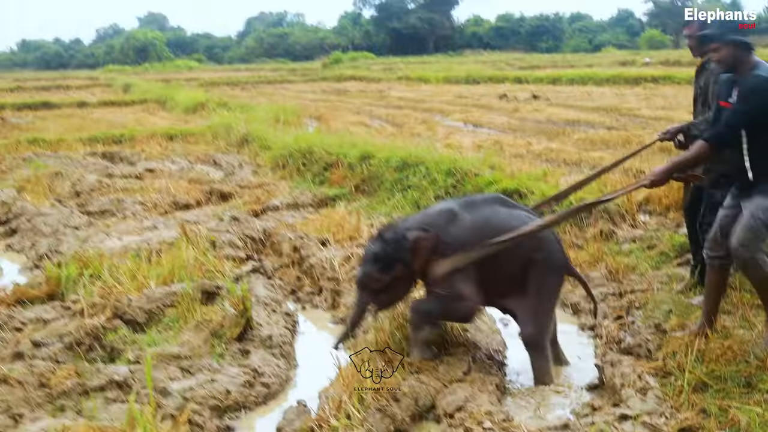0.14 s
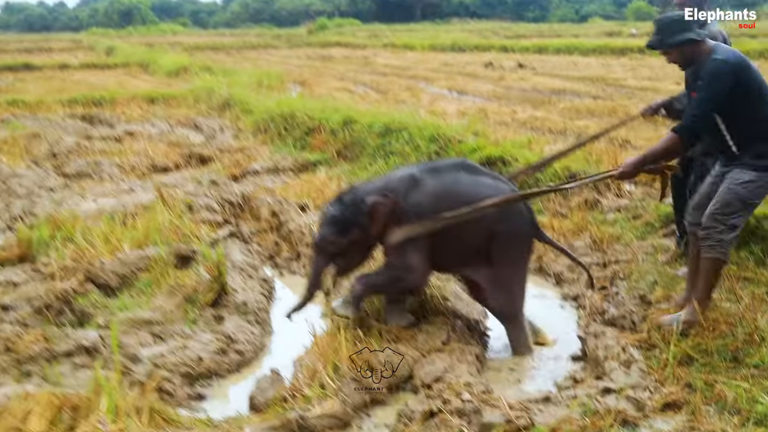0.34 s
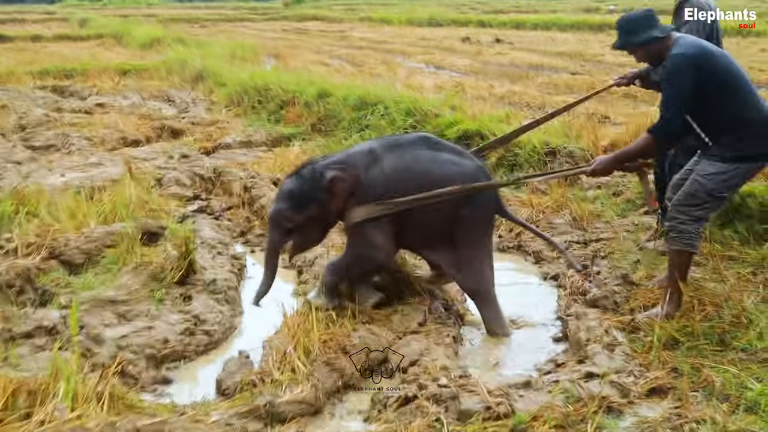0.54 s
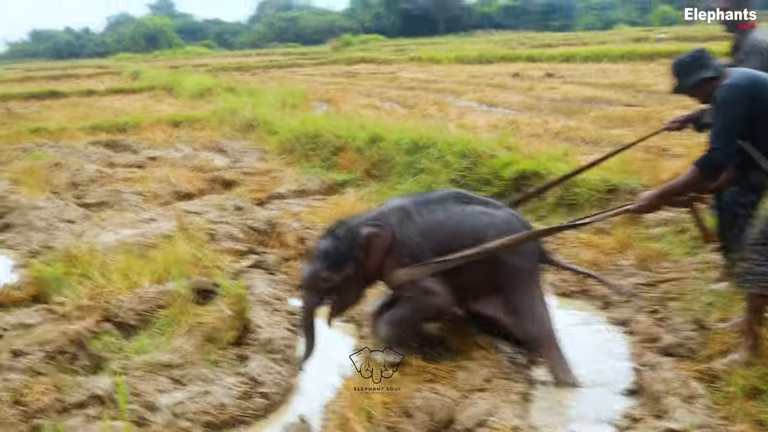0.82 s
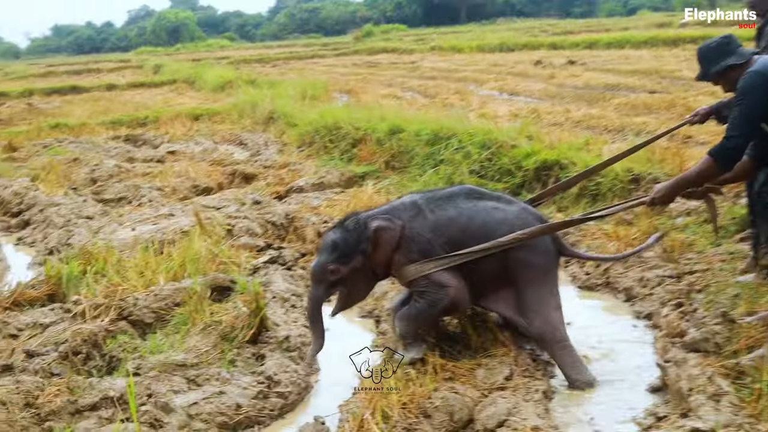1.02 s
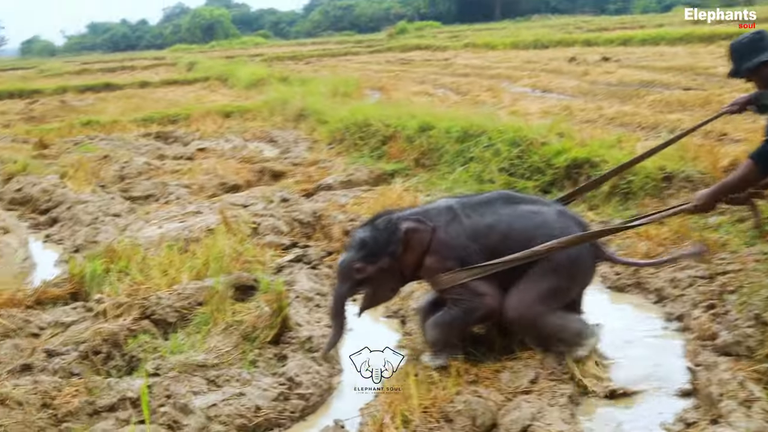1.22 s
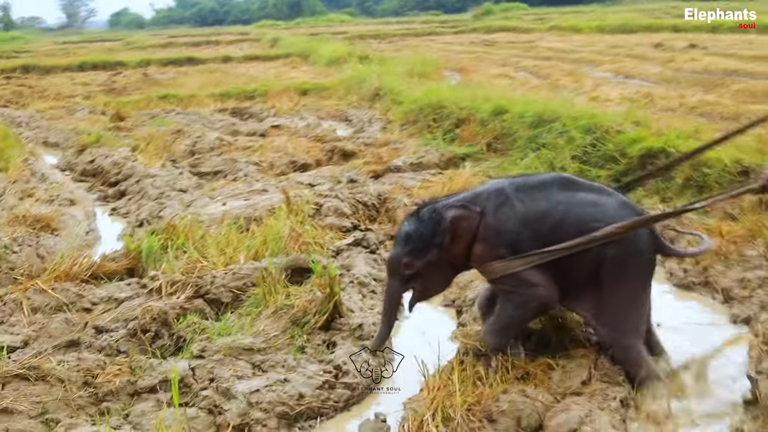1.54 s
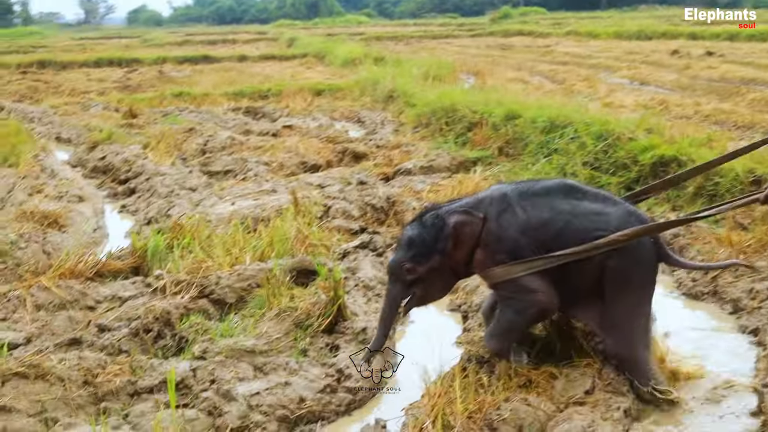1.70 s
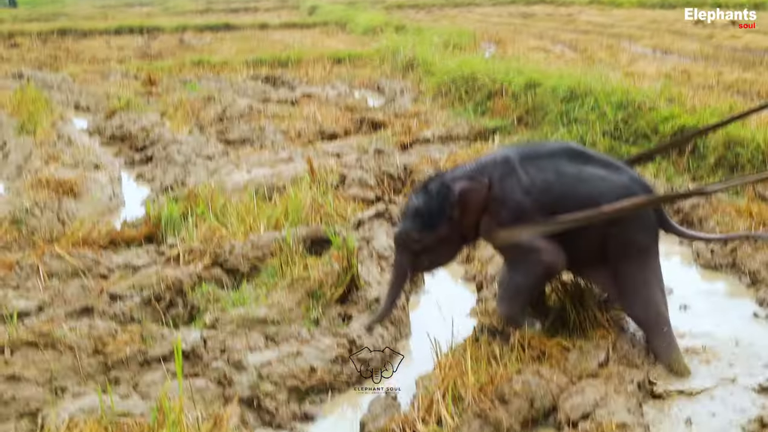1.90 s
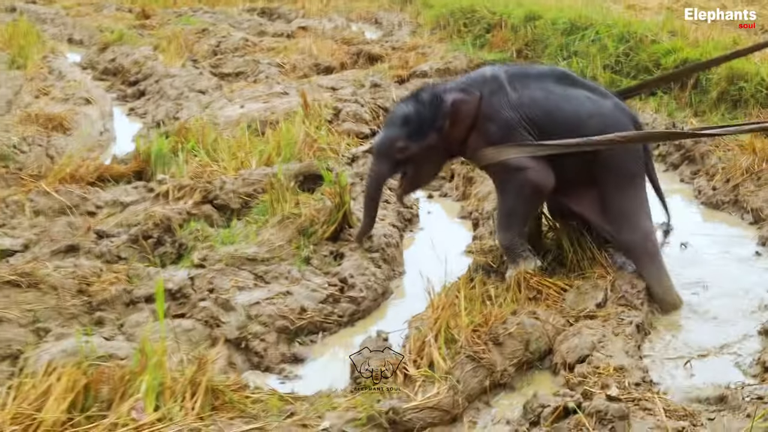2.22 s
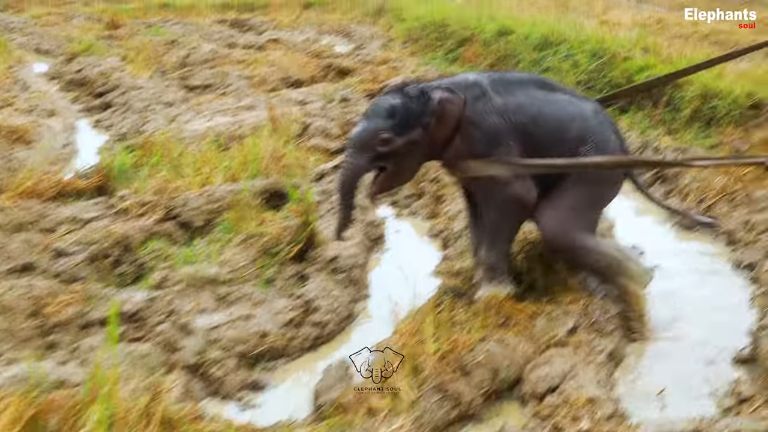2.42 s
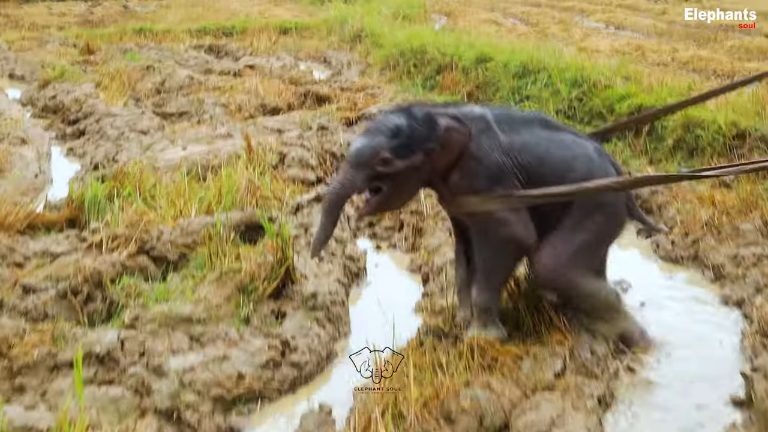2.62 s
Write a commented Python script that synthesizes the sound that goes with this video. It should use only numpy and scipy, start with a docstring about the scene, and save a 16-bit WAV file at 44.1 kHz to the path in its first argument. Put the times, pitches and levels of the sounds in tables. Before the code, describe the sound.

An elephant calf roars twice in an open field. Faint mud plops and a very faint distant tone come first; slow throaty pulses at 0.45 s grow into a gravelly, rasping roar, fading by 1.55. A tiny straw snap and thuds sit beneath it. Soft footfalls and wet splashes fill 1.45-2.2. A harsher, brighter roar starts near 2.3, continuing to the end at about 2.75. Low wind rumbles throughout.

```python
"""An elephant calf roars twice in an open muddy field: slow rough throat pulses ring in its throat resonances.
Slow pulses open the first roar, low multiples of the pulse rate add chest rumble, and breath puffs rasp.
A straw snaps as a click rings two modes; feet thud by ringing ground modes; mud splashes as short rings.
A faint pair of partials sounds far off, and bands of noise make the field noise and wind rumble below."""
import sys
import numpy as np
from scipy import signal
from scipy.io import wavfile
from scipy.ndimage import uniform_filter1d

SR = 44100
rng = np.random.default_rng(int(sys.argv[2]) if len(sys.argv) > 2 else 0)


def volts(x):
    """Linear amplitude factor 10**(x/20) for a level x in dB, scalar or array-like."""
    e = np.asarray(x, float) / 20
    return 10 ** e


def master(y):
    """Save y as 16-bit WAV."""
    cut = np.clip(np.atleast_2d(y).T, -1, 1)
    pcm = np.round(cut * 32767)  # scale
    wavfile.write(sys.argv[1], SR, pcm.astype(np.int16))


N = 121275  # samples

# vocal folds: (time [s], pulse rate [1/s], roughness [0-1])
VOCAL_FOLDS = [(0.44, 44, 0.6), (0.65, 47, 0.8), (0.9, 50, 0.6), (1.2, 56, 0.8), (1.33, 66, 0.48),
               (1.5, 58, .6), (2.27, 50, 0.8), (2.75, 52, 0.5)]
# throat resonances of each roar, four groups: (frequency [Hz], overall width [Hz], relative level [dB])
FIRST_THROAT = [
    [(475, 114, 0), (597, 46, -9.5)],
    [(915, 43, -11), (1110, 195, 4), (843, 347, -0.5)],
    [(1401, 150, 1), (1680, 129, -2.5), (1900, 157, -3.5)],
    [(2796, 450, 9.5), (4010, 313, 3), (4370, 1300, -2.5), (6090, 1500, -8.5)],
]
SECOND_THROAT = [
    [(484, 57, 7.1), (670, 130, 2)],
    [(947, 102, -4.5), (846, 19, -7), (1253, 32, -12.5)],
    [(1448, 360, 1.5), (2043, 97, -2), (2336, 160, -1.5)],
    [(2750, 124, 9), (4010, 1600, -8), (5020, 680, -13.5), (6204, 190, -8.5), (8040, 890, -24)],
]
# level of the lowest resonance group, one list per roar: (time [s], level [dB])
LOWEST_LEVEL = [
    [(0.585, -75), (0.612, -34), (0.648, -33.5), (0.666, -20), (0.686, -30.5), (0.716, -21.5),
     (0.75, -41.5), (0.782, -24), (0.832, -36), (0.858, -24.5), (0.888, -33), (0.932, -27.5), (0.948, -34),
     (1.048, -27.5), (1.092, -32.5), (1.232, -29), (1.366, -37), (1.56, -62)],
    [(2.27, -94), (2.3, -47), (2.336, -35.5), (2.494, -26), (2.75, -26.5)],
]
# level of the second resonance group, one list per roar: (time [s], level [dB])
SECOND_LEVEL = [
    [(0.46, -60.5), (0.56, -47), (0.67, -39.5), (0.72, -30), (0.818, -30.5), (0.858, -28), (0.918, -32),
     (1.044, -30.5), (1.268, -31.5), (1.516, -56), (1.56, -72)],
    [(2.28, -70), (2.32, -42.5), (2.37, -31.5), (2.47, -26), (2.487, -11), (2.501, -30), (2.515, -12.5),
     (2.532, -25), (2.545, -17), (2.567, -15), (2.578, -29), (2.588, -17), (2.6, -16.5), (2.612, -23),
     (2.62, -30.5), (2.628, -11), (2.638, -30), (2.653, -17.5), (2.667, -18.5), (2.68, -17), (2.75, -23)],
]
# levels of the two upper groups, one list per roar: (time [s], upper throat level [dB], treble level [dB])
UPPER_LEVELS = [
    [(0.46, -61, -69), (0.6, -44.5, -64.5), (0.67, -35.5, -51.5), (0.84, -39, -58), (1.02, -37, -54.5),
     (1.26, -43, -58), (1.36, -51, -59), (1.43, -56, -65), (1.56, -58.5, -71)],
    [(2.28, -70, -87), (2.31, -55, -72), (2.36, -39.5, -50), (2.47, -37, -39.5), (2.58, -35.5, -42),
     (2.75, -31, -40.5)],
]
# tones locked to the two lowest groups:
# (time [s], low frequency [Hz], second frequency [Hz], low power share [0-1], second power share [0-1])
LOCKED_TONES = [(0.44, 463, 925, 0.6, 0), (0.75, 464, 930, 0.69, 0.44), (0.87, 480, 971.5, 0.46, 0.26),
                (1.05, 475, 1099, .25, 0.11), (1.3, 495.5, 1033, 0.12, 0.02),
                (1.5, 468.9, 1110, 0.06, 0.06), (2.28, 530, 900, 0.44, 0.05), (2.44, 520, 963, .55, 0),
                (2.49, 512, 968, 0.75, 0.82), (2.6, 512, 966.3, 0, 0.35), (2.75, 520, 924, 0.13, 0.02)]
# sinking strands of the second roar, one on the upper band, one on the treble:
# (time [s], frequency [Hz], level relative to the band [dB])
SINKING_STRANDS = [
    [(2.33, 2210, -19), (2.45, 2030, 2.5), (2.53, 1860, 0.5), (2.57, 1570, 4.5), (2.75, 1480, -4.5)],
    [(2.35, 2800, 11), (2.5, 2660, -8), (2.59, 2290, 2.5), (2.75, 2200, 4.5)],
]
# throbbing of the breath from cycle to cycle, one per roar: (depth exponent [1])
BREATH_THROB = [.9, .55]
# how firmly each cycle shuts the breath, one per resonance group: (exponent [1])
BREATH_SHUTTING = [.3, .45, .65, .75]
# calf's left minus right, one per resonance group: (level difference [dB])
CALF_PAN = [-7.5, -4, -11.5, 0.5]
# calf's ground echoes, one per resonance group: (level relative to the direct sound [dB])
CALF_ECHO = [-34.5, -12, -12, -5.5]
# slow separate pulses that open the first roar: (time [s], peak level [dB])
OPENING_PULSES = [(0.463, -36), (0.509, -31), (0.553, -26), (0.593, -27)]
# chest rumble: (time [s], common level [dB])
CHEST_LEVEL = [(1.0, -58), (1.349, -55.5), (1.42, -54), (1.541, -59.5)]
# chest partials: (multiple of the pulse rate [1], relative level [dB])
CHEST_PARTIALS = [(2, 1.5), (3, -1), (4, -5.5), (7, 1.5)]
# harsh rasps: (time [s], relative level [dB], further level in the higher resonances [dB])
RASP_EVENTS = [(0.5776, -45.5, -1.5), (0.5914, -49.5, -4), (0.623, -40, -25), (0.6652, -41.5, -26),
               (0.6885, -36, -6.5), (0.7351, -37, -6), (0.9359, -47, 2), (0.9933, -42, -5),
               (1.03, -35.5, -5.5), (1.051, -40, -14), (1.092, -39.5, -14), (1.1624, -37.5, -10.5),
               (1.2357, -42.5, -7.5), (1.274, -43.5, -24), (1.479, -52.5, -5), (2.557, -35, 1.5),
               (2.58, -35.5, 1.5), (2.637, -35.5, -1.8), (2.661, -29.5, -4.5)]
# modes of the snapping straw: (frequency [Hz], 60 dB decay time [s])
STRAW_MODES = [(2850, .014), (3950, .011)]
# footfalls in the mud: (time [s], relative level [dB], further level of the last two ground modes [dB])
FOOTFALLS = [(0.424, -41.5, 28), (0.612, -30.5, 5), (0.699, -27.5, 7.5), (0.968, -22.5, 8),
             (1.62, -28, 15.5), (1.681, -49, 27.5), (1.8, -45, 17.5), (1.954, -40, 22), (2.205, -49.5, -12),
             (2.63, -40.5, 9.5), (2.688, -44.5, 13)]
# ground modes: (frequency [Hz], relative level [dB], 60 dB decay time [s])
GROUND_MODES = [(60.8, -10.5, 0.31), (156.5, 8, 0.13), (213, 1, 0.15), (294.5, -1.5, 0.024),
                (387, -3.5, 0.026)]
# deep soft bump of a low gust of wind: (time [s], length [s], peak level [dB], frequency [Hz])
WIND_BUMP = (0.64, .08, -36, 57)
# splashes and rustles of water and straw: (time [s], length [s], level [dB])
SPLASHES = [(0.0, 0.072, -58), (0.123, 0.014, -53), (1.458, 0.048, -52.5), (1.683, 0.038, -53),
            (1.713, 0.11, -58), (1.884, 0.036, -60)]
# single plops of mud: (time [s], peak level [dB], frequency [Hz])
MUD_PLOPS = [(0.052, -42, 593), (1.649, -38.5, 482), (1.839, -44, 850)]
# span of the far tone: (start [s], end [s], fade [s])
FAR_TONE_SPAN = (0.19, 0.45, 0.09)
# partials of the far tone: (frequency [Hz], level [dB])
FAR_PARTIALS = [(1400, -66), (2105, -69.5)]
# field noise spectrum: (frequency [Hz], relative density [dB per Hz])
FIELD_SPECTRUM = [(22, -10.5), (55, -4), (200, -7.5), (450, -9), (800, -12), (1600, -14.5), (3000, -20),
                  (6000, -26), (10000, -30.5), (16000, -38)]
# field noise, left minus right: (frequency [Hz], level difference [dB])
FIELD_BALANCE = [(60, -11.5), (200, -0.5), (700, -4), (3000, 0), (16000, 2)]

JITTER_CYCLES, PULSE_SPREAD_DB = 0.14, 3.5  # at full roughness
LOCK_WAVER = 0.0129  # relative frequency wander
SINKING_WANDER_HZ = 75
OPENING_HZ, OPENING_T60_S = 465, 0.17
RASP_RISE_S, RASP_TRIM_DB, RASP_ECHO_DB = 0.0029, -4, -14
SNAP_S, SNAP_CLICK_DB = 0.9580, -31
THUD_CORNER_HZ, THUD_TRIM_DB, THUD_SWELL_S, THUD_PAN_DB = 563, -1.5, 0.0071, -10.5
DROPS_PER_S, DROP_SPREAD_DB, SLOSH_PAN_DB = 2000, 4, -5.5
DROP_CYCLES, PLOP_CYCLES = 7.9, 30  # cycles to decay 60 dB
FIELD_DB, RUMBLE_PATCHY_DB, RUMBLE_ALIKE_HZ = -52.5, 7, 150


def rms_one(x):
    """Normalization to unit root-mean-square value."""
    return x / np.sqrt(np.mean(x ** 2) + 1e-20)


def in_time(rows):
    """Linear interpolation of each column over time."""
    s, *columns = np.transpose(rows)
    return [np.interp(np.arange(N) / SR, s, c) for c in columns]


def at_hz(points, hz):
    """Interpolation on a logarithmic frequency axis."""
    known_hz, value = np.transpose(points)
    return np.interp(np.log(hz), np.log(known_hz), value)


def drift(rate_hz):
    """Low-passed noise: a double real pole leaves a slow random wander with spread 1."""
    r = np.exp(-80 * np.pi * rate_hz / SR)  # computed at every 40th sample
    white = rng.standard_normal(N // 40 + 2002)
    slow = signal.lfilter([1], [1, -2 * r, r * r], white)[2000:]
    return np.interp(np.arange(N) / 40, np.arange(len(slow)), rms_one(slow))


def resonate(x, hz, width_hz):
    """Simple resonance: a pole pair between two zeros, with gain 1 on top."""
    r = np.exp(-np.pi * width_hz / SR)
    poles = [1, -2 * r * np.cos(2 * np.pi * hz / SR), r * r]
    return signal.lfilter([(1 - r * r) / 2, 0, (r * r - 1) / 2], poles, x + 1e-18)


def ring(clicks, hz, t60):
    """Free decay of a damped oscillator: a unit click starts a sine of height 1."""
    r = volts(-60 / (t60 * SR))
    w = 2 * np.pi * hz / SR
    return signal.lfilter([0, np.sin(w)], [1, -2 * r * np.cos(w), r * r], clicks + 1e-18)


def click_at(s):
    """Unit impulse at the given second."""
    return np.arange(N) == int(s * SR)


def tilt(pan_db):
    """Level difference shared equally between left and right."""
    return np.array([[0.5], [-0.5]]) * pan_db


def place(x, pan_db, echo_db):
    """Intensity panning, plus short echoes whose delays differ left and right."""
    late = lambda d: np.concatenate([np.zeros(d), x[:-d]])
    echo = np.stack([late(263) - late(611), late(397) - late(829)])  # delays in samples
    gains = volts(tilt(pan_db))
    return (x + volts(echo_db) * echo) * gains / np.mean(gains)


def gate(start, end, fade):
    """Trapezoidal envelope with linear fades."""
    t = np.arange(N) / SR
    return np.clip(np.minimum(t - start, end - t) / fade, 0, 1)


def lowpass(x, hz):
    """Second-order low-pass filter."""
    return signal.sosfilt(signal.butter(2, hz, fs=SR, output="sos"), x)


def throat(x, group):
    """Parallel formants of alternating sign, each passed twice for deep valleys."""
    out = 0
    for k, (hz, width, db) in enumerate(group):
        twice = resonate(resonate(x, hz, 1.5 * width), hz, 1.5 * width)
        out = out + (-1) ** k * volts(db) * twice
    return out


def fold_source():
    """Glottal excitation: jittered pulses of uneven strength, with a puff that decays in each cycle."""
    rate, rough = in_time(VOCAL_FOLDS)
    rough = np.clip(rough, 0, 1)
    cycle = np.cumsum(rate) / SR + JITTER_CYCLES * rough * drift(25)
    index = np.clip(np.floor(cycle).astype(int), 0, 299)
    strength = volts(PULSE_SPREAD_DB * rough * rng.standard_normal(300)[index])  # one draw per cycle
    pulses = rms_one(np.diff(np.maximum.accumulate(index), prepend=0) * strength)
    puff = uniform_filter1d(np.exp(-3.0 * (cycle % 1)), size=200)
    return rough, strength, pulses, puff


def roars():
    """Source and filter: fold pulses and gated breath excite formants; tones lock to the two lowest groups."""
    rough, strength, pulses, puff = fold_source()
    out, lock = 0, in_time(LOCKED_TONES)
    for n, groups in enumerate((FIRST_THROAT, SECOND_THROAT)):
        end = max(LOWEST_LEVEL[n][-1][0], SECOND_LEVEL[n][-1][0]) + 0.01
        on = gate(SECOND_LEVEL[n][0][0], end, 0.01)
        levels = in_time(LOWEST_LEVEL[n]) + in_time(SECOND_LEVEL[n]) + in_time(UPPER_LEVELS[n])
        for k, (group, db) in enumerate(zip(groups, levels)):
            throb = (strength * puff ** BREATH_SHUTTING[k]) ** BREATH_THROB[n]
            breath = rms_one(rng.standard_normal(N) * throb)
            share = rough ** (BREATH_THROB[n] / (1 + k * k))  # more breath in higher groups
            voice = throat((1 - share) * pulses + share * breath, group)
            voice = voice / np.sqrt(uniform_filter1d(voice ** 2, size=1600) + 1e-20)  # even short-time power
            if k < 2:
                phase = 2 * np.pi * np.cumsum(lock[k] * (1 + LOCK_WAVER * drift(34.5))) / SR
                tone = np.sqrt(2) * np.sin(phase)
                locked = np.clip(lock[k + 2], 0, 1)
                voice = np.sqrt(locked) * tone + np.sqrt(1 - locked) * voice
            if n == 1 and k >= 2:
                hz, over_db = in_time(SINKING_STRANDS[k - 2])
                strand = drift(SINKING_WANDER_HZ) * np.sin(2 * np.pi * np.cumsum(hz) / SR)
                voice = voice + volts(over_db) * strand
            level = uniform_filter1d(volts(db), size=300)
            out = out + place(on * level * voice, CALF_PAN[k], CALF_ECHO[k])
    return out


def opening_pulses():
    """Impulse response: each slow separate pulse rings one damped resonance."""
    clicks = sum(volts(db) * click_at(s) for s, db in OPENING_PULSES)
    return place(ring(clicks, OPENING_HZ, OPENING_T60_S), CALF_PAN[0], CALF_ECHO[0])


def chest_rumble():
    """Harmonic series: sines at low multiples of the unjittered pulse rate."""
    cycle = np.cumsum(in_time(VOCAL_FOLDS)[0]) / SR
    chest = sum(volts(db) * np.sin(2 * np.pi * k * cycle + k * k) for k, db in CHEST_PARTIALS)
    level = gate(CHEST_LEVEL[0][0], CHEST_LEVEL[-1][0], 0.02) * volts(in_time(CHEST_LEVEL)[0])
    return place(level * np.sqrt(2) * chest, CALF_PAN[0], -23)


def rasps():
    """Turbulence noise: short swelling puffs of breath in the treble formants; bright ones excite higher ones."""
    t, out = np.arange(N) / SR, 0
    for k, group in enumerate((FIRST_THROAT[3][:1], FIRST_THROAT[3][1:])):
        shape = 0
        for s, db, bright_db in RASP_EVENTS:
            age = np.clip(t - s, 0, None) / RASP_RISE_S
            shape = shape + volts(db + RASP_TRIM_DB + k * bright_db) * age * np.exp(1 - age)
        out = out + shape * rms_one(throat(rng.standard_normal(N), group))
    return place(out, CALF_PAN[3], RASP_ECHO_DB)


def straw_snap():
    """Impact excitation: one softened click rings two short modes."""
    click = volts(SNAP_CLICK_DB) * click_at(SNAP_S)
    click = resonate(resonate(click, 3400, 3000), 3400, 3000)  # soft contact
    modes = sum(ring(click, hz, t60) for hz, t60 in STRAW_MODES)
    return place(modes, CALF_PAN[3], RASP_ECHO_DB)


def thuds():
    """Modal excitation: a soft swelling push rings ground modes, with new strengths each step; a low gust of
    wind adds one deep bump."""
    s, db, bright_db = np.transpose(FOOTFALLS)
    chance_db = rng.normal(0, 1.5, (len(s), len(GROUND_MODES)))
    t, out = np.arange(N) / SR, 0
    for k, (hz, level_db, t60) in enumerate(GROUND_MODES):
        gains = volts(db + level_db + THUD_TRIM_DB + chance_db[:, k] + bright_db * (k > 2))
        for start, gain in zip(s, gains):
            age = np.clip(t - start, 0, None)
            envelope = (1 - np.exp(-age / THUD_SWELL_S)) * volts(-60 * age / t60)
            out = out + gain * envelope * np.sin(2 * np.pi * hz * age)
    start, length, bump_db, bump_hz = WIND_BUMP
    out = out + volts(bump_db) * gate(start, start + length, length / 2) * np.sin(2 * np.pi * bump_hz * t)
    return place(lowpass(out, THUD_CORNER_HZ), THUD_PAN_DB, -14)


def slosh():
    """Random impulse excitation: droplets of chance size and single plops ring as damped oscillators."""
    size_db = DROP_SPREAD_DB * np.minimum(rng.exponential(1, N), 5)
    falls = rng.random(N) < DROPS_PER_S / SR
    clicks = volts(size_db) * rng.choice([-1, 1], N) * falls
    dealt = rng.integers(0, 16, N)  # each drop gets one of 16 pitches
    pitches_hz = np.geomspace(1300, 3600, 16)
    drops = sum(ring(clicks * (dealt == k), hz, DROP_CYCLES / hz) for k, hz in enumerate(pitches_hz))
    level = sum(volts(db) * gate(s, s + length, length / 3) for s, length, db in SPLASHES)
    plops = sum(ring(volts(db) * click_at(s), hz, PLOP_CYCLES / hz) for s, db, hz in MUD_PLOPS)
    return place(lowpass(level * rms_one(drops) + plops, 4500), SLOSH_PAN_DB, -5)


def far_tone():
    """Frequency modulation: two faint partials share one slight random waver."""
    t = np.cumsum(1 + 0.0059 * drift(16)) / SR
    partials = sum(volts(db) * np.sin(2 * np.pi * hz * t) for hz, db in FAR_PARTIALS)
    return gate(*FAR_TONE_SPAN) * np.sqrt(2) * partials


def field():
    """Band-filtered noise: half-octave bands, alike left and right in the bass, which comes in lumps."""
    out, edges = 0, 20 * 2 ** np.arange(0, 10, 0.5)
    white = rng.standard_normal((2, 2, N))  # neighbouring bands use different noise
    for k, (low, high) in enumerate(zip(edges, edges * 2 ** 0.5)):
        hz = np.sqrt(low * high)
        bandpass = signal.butter(2, [low, min(high, 19000)], "band", fs=SR, output="sos")
        band = signal.sosfilt(bandpass, white[k % 2])
        alike = 1 / (1 + (hz / RUMBLE_ALIKE_HZ) ** 2)  # correlation of the two sides
        band = np.stack([band[0], alike * band[0] + np.sqrt(1 - alike ** 2) * band[1]])
        lumps_db = RUMBLE_PATCHY_DB * min(1, 400 / hz) * drift(17.8)
        out = out + band * volts(at_hz(FIELD_SPECTRUM, hz) + lumps_db + tilt(at_hz(FIELD_BALANCE, hz)))
    return volts(FIELD_DB) * out / np.sqrt(np.mean(out.mean(axis=0) ** 2))


def scene():
    """Linear superposition of all sources."""
    calf = roars() + opening_pulses() + chest_rumble() + rasps()
    return calf + straw_snap() + thuds() + slosh() + far_tone() + field()


def low_pass(x):
    """Removes everything above the highest recorded frequency."""
    return signal.sosfilt(signal.butter(12, 15720, fs=SR, output="sos"), x)


def record(dry):
    """Transmission of the finished stereo mix."""
    return low_pass(dry)


dry = scene()
out = record(dry)
master(out)
```